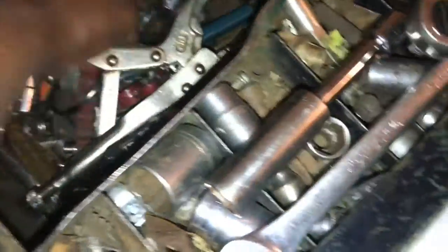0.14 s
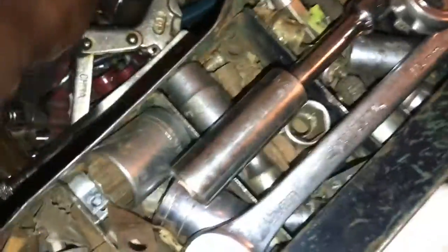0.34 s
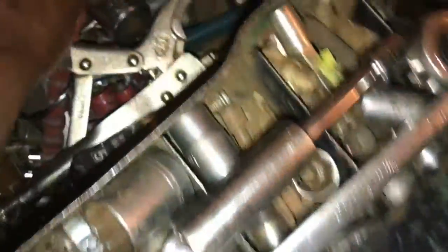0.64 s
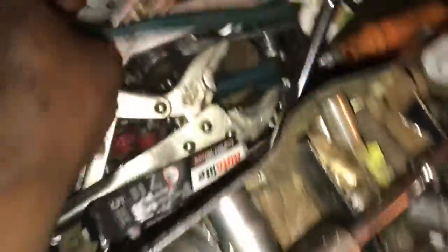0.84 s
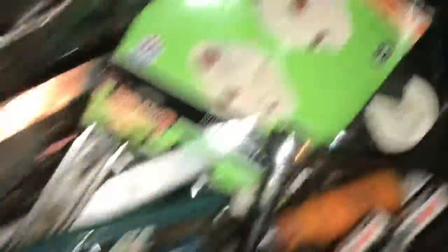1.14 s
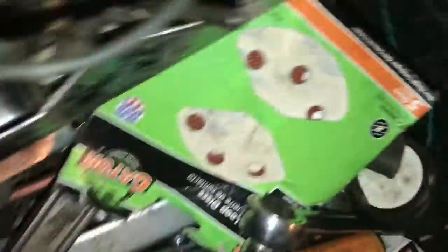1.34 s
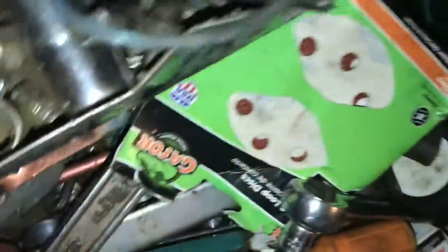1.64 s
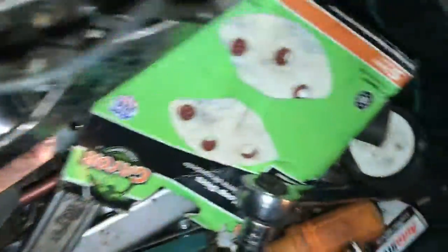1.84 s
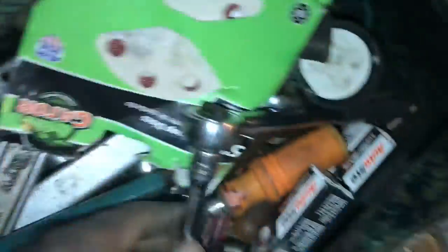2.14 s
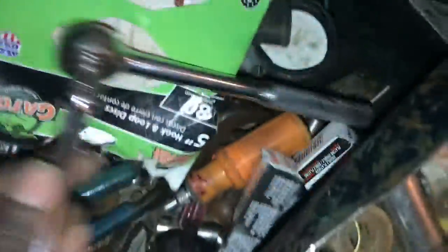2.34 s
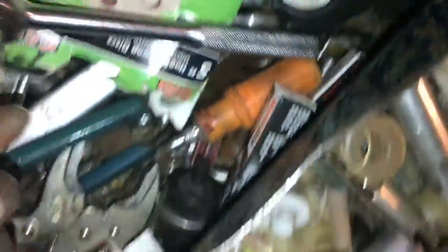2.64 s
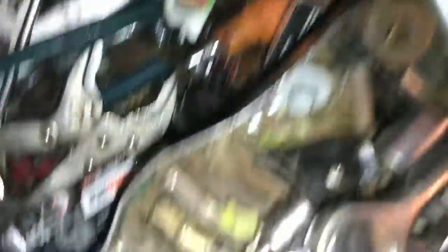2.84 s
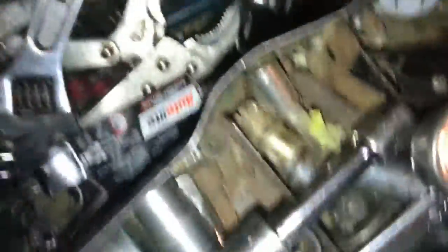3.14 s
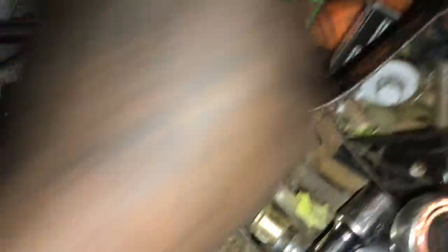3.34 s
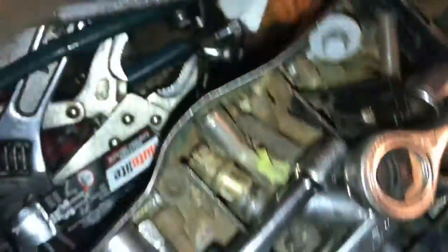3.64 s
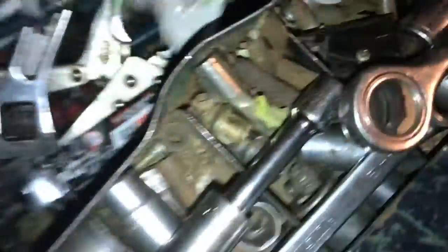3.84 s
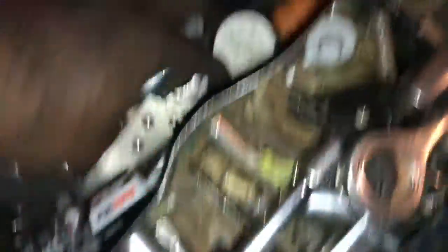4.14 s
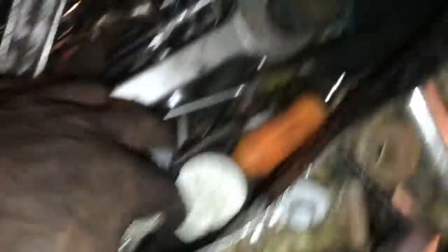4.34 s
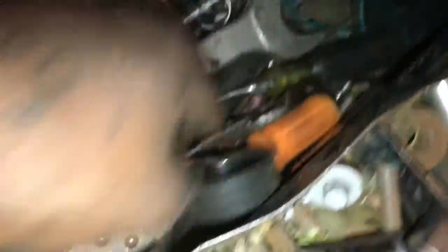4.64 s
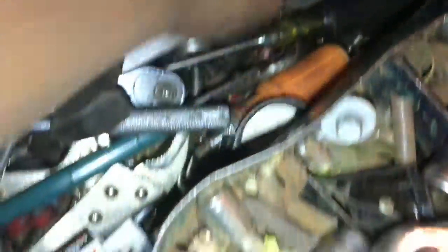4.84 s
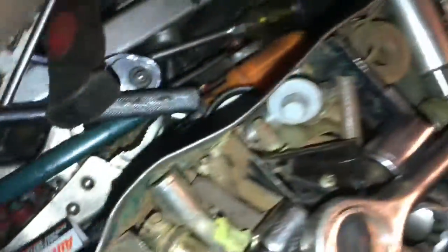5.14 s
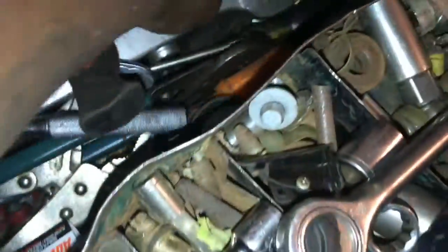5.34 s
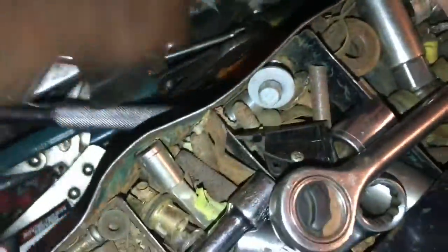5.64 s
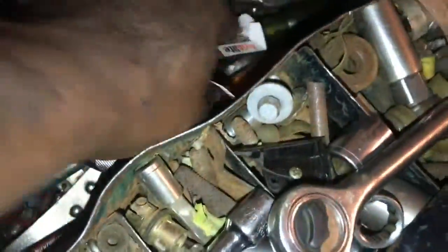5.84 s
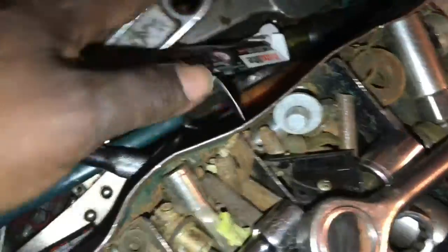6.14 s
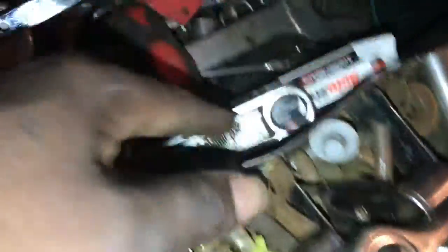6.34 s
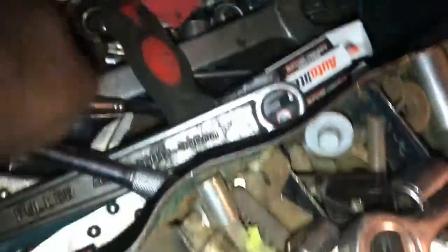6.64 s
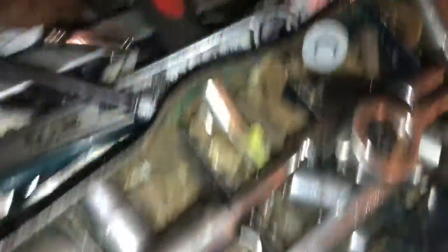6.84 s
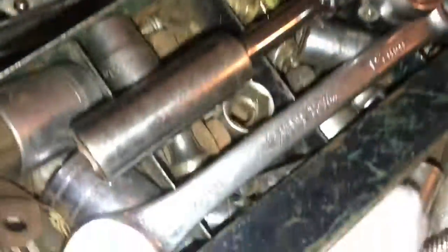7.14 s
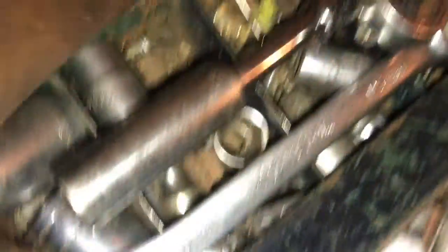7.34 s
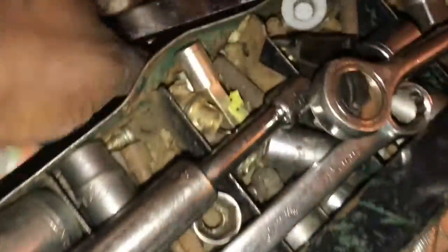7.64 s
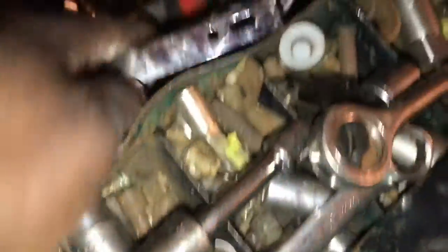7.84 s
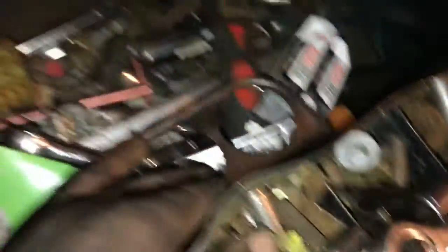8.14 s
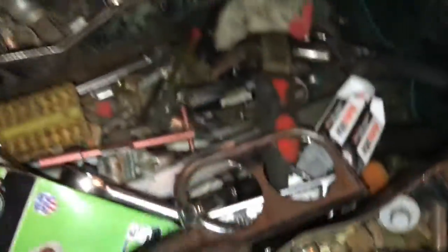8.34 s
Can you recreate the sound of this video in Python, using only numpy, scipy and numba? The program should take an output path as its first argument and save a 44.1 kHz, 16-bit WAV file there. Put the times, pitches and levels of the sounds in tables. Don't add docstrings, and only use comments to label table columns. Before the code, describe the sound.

A hand rummages through a metal toolbox, sockets and wrenches clinking, rattling and thudding in bursts, with a brief near-quiet lull early on.

```python
import sys
import numpy as np
from scipy import signal
from scipy.fft import rfft, irfft, next_fast_len
from scipy.io import wavfile
from scipy.ndimage import uniform_filter1d
from numba import njit

SR = 44100
rng = np.random.default_rng(int(sys.argv[2]) if len(sys.argv) > 2 else 0)


def rack_gain(trim_db):
    fader = np.asarray(trim_db, float)
    return 10 ** (fader / 20)


def pcm_store(signal):
    levels = np.round(np.clip(np.atleast_2d(signal), -1, 1) * 32767)
    wavfile.write(sys.argv[1], SR, levels.astype(np.int16).T)


N = 374409

# (frequency [Hz], level per Hz [dB])
GARAGE = [(15, -39), (25, -10), (59, 10), (120, 0.5), (170, 4.5), (285, -5), (516, -25), (911, -22.5),
          (1020, -29.5), (1700, -44.5), (2110, -37), (4870, -43.5), (6210, -48.5), (16000, -40)]
GARAGE_DB = -47.5
# (frequency [Hz], width [Hz], level [dB])
HUM = [(633, 39, -60), (1030, 31, -62.5)]
ROOM_DB, ROOM_T60_S = -28.5, 0.091

# (frequency [Hz], level per Hz [dB])
STEEL = [(880, -13.5), (1500, -8.5), (1980, -11), (3400, -3.5), (5550, -6.5), (6010, -2.5), (8360, -7.5),
         (10400, -8), (14300, -13), (16300, -20.5)]
# (frequency [Hz], width [Hz], level [dB])
BODY = [(725, 120, 13.5), (1220, 600, 14.5)]
# (frequency [Hz], width [Hz], level [dB])
BOX = [(171.5, 11, 11), (243, 54, 11.5), (284, 23, 12)]

# (peak time [s], swell [s], settle [s], rattle level [dB],
# dull scrape re rattle [dB])
SHOVES = [(0.484, 0.15, 0.13, -12, 3), (0.771, 0.038, 0.1, -32, 5), (0.981, 0.34, 0.16, -32.5, 2.5),
          (2.33, 0.27, 0.42, -34.5, 4.5), (2.852, 0.21, 0.58, -30.5, 2), (3.057, 0.065, 0.053, -19.5, 2),
          (3.131, 0.048, 0.21, -31, 5), (3.33, 0.019, 0.18, -29.5, 8), (3.691, 0.045, 0.13, -30.5, 2.5),
          (3.982, 0.065, 0.36, -21, 2.5), (4.678, 0.23, 0.21, -36.5, 9.5), (4.97, 0.054, 0.095, -41, 3),
          (5.269, 0.25, 0.46, -24, 2), (5.74, 0.27, 0.45, -23, -2), (6.041, 0.58, 0.094, -36, 16),
          (6.28, 0.034, 0.23, -38.5, 6.5), (6.42, 0.21, 0.18, -27, 3), (7.08, 0.42, 0.53, -43.5, 13),
          (7.57, 0.03, 0.88, -47.5, 8.5), (7.75, 0.16, 0.13, -34, -14), (8.122, 0.057, 0.043, -22, -8.5)]
# (peak time [s], swell [s], settle [s], rattle level [dB],
# dull scrape re rattle [dB])
SPILLS = [(0.0, .1, 0.13, -20, 9), (0.219, 0.046, 0.3, -20.5, 3.5), (4.202, 0.56, 0.16, -23, 5),
          (4.38, 0.13, 0.12, -29, -10.5), (5.402, 0.17, 0.17, -24.5, 5.5), (6.939, 0.21, 0.12, -25.5, 10.5),
          (7.365, 0.16, 0.2, -20, -3), (8.21, 0.029, 0.16, -21, -18), (8.33, 0.39, 0.13, -22.5, -30)]
SPAN_DB = 30
SHOVE_TOP_DB, SPILL_TOP_DB, RUMBLE_DB = -7.5, 4, -1.13
TOP_PACE, DULL_PACE, RUMBLE_PACE = 1.62, 0.97, 0.82
# (time [s], rattle level [dB])
STIR = [
    (0, -48.5),
    (1.15, -66.5),
    (1.8, -78.5),
    (2.09, -89),
    (4.8, -76),
    (8.49, -74.5),
]
STIR_TOP_DB, STIR_DULL_DB, STIR_RUMBLE_DB = -5.5, 7.5, 19

# (time [s], peak level [dB], strongest pitch [Hz], t60 [s])
PINGS = [(3.1039, -1.5, 6490, 0.054), (3.1335, -4, 5150, 0.068), (3.2888, 0, 6120, 0.094),
         (4.0847, 1, 8540, .041), (4.1142, 0, 5220, 0.058), (5.1407, -7, 3890, 0.068),
         (5.793, -6.5, 6560, 0.073), (5.877, -9, 8720, 0.05), (6.092, -15.5, 10900, 0.034),
         (6.5866, -13, 8400, 0.043), (7.4045, -3, 4534, 0.06), (7.694, -22, 5550, .071),
         (7.723, -14.5, 12980, 0.071), (7.388, -7, 14100, 0.027), (6.046, -8.5, 11300, 0.031),
         (8.1232, -20.5, 6180, 0.13), (8.1893, -10, 3215, 0.051)]
# (time [s], peak level [dB], strongest pitch [Hz], t60 [s])
CLINKS = [(0.181, -21, 5400, 0.1), (.378, -12, 4240, 0.084), (0.7094, -27.5, 3600, 0.028),
          (0.892, -3, 6180, 0.05), (0.952, -6.5, 5800, 0.06), (0.9908, -3.5, 5230, .03),
          (1.524, -36, 2230, 0.013), (2.212, -14, 5740, 0.016), (2.2337, -15.5, 2380, 0.021),
          (3.38, -10.5, 5890, .087), (3.793, -16, 4300, 0.011), (3.9715, -2, 6030, 0.039),
          (4.1715, -6.5, 5290, 0.046), (4.285, -15.5, 4260, 0.024), (5.1061, -8, 2410, 0.04),
          (4.8158, -20.5, 3070, 0.035), (5.229, -4.5, 7000, 0.035), (5.641, -9.5, 3930, 0.018),
          (5.7251, -4.5, 6630, 0.089), (6.2894, -24, 3170, 0.21), (6.8932, -15, 2670, 0.05),
          (5.502, -18.5, 6010, 0.049), (6.9428, 1.5, 3150, 0.037), (6.9796, -13.5, 4740, 0.16),
          (7.1944, -21, 6300, 0.039), (7.266, -19.5, 5400, 0.16), (7.556, -9.5, 7700, 0.089),
          (7.909, -21.5, 3320, 0.094), (3.206, -23.5, 2680, 0.036)]
# (time [s], peak level [dB], strongest pitch [Hz], t60 [s])
KNOCKS = [(0.0609, -9, 8200, 0.015), (0.3995, 0, 6020, 0.064), (2.287, -18, 2500, 0.016),
          (1.6133, -52, 2080, .02), (6.157, -29.5, 2280, 0.084), (0.6642, -33, 5950, 0.035),
          (0.745, -27, 8800, 0.074), (0.7733, -13, 6600, 0.04), (2.604, -17.5, 3130, 0.049),
          (2.8333, 0, 1996, 0.085), (2.9183, -10, 3354, 0.07), (3.5011, -21, 3890, 0.045),
          (3.6062, -25.5, 3200, 0.018), (3.8425, -17.5, 2366, 0.17), (4.625, -14.5, 6380, 0.067),
          (5.3736, -1.5, 8150, 0.088), (5.557, -12.5, 4040, 0.044), (6.259, -14, 5800, 0.05),
          (6.4672, -4.5, 3414, 0.051), (6.686, -20, 6740, 0.097), (7.1109, -19.5, 3760, 0.21),
          (7.306, -18, 3700, 0.1), (7.3412, -7, 6193, 0.029), (7.432, -10.5, 7130, 0.098)]
# (time [s], peak level [dB], strongest pitch [Hz], t60 [s])
CLANKS = [(.0004, -3.5, 7260, 0.016), (0.2098, -4, 4900, 0.054), (1.0155, -15.5, 4970, 0.042),
          (1.438, -45.5, 2600, .033), (2.107, -31, 4400, 0.046), (2.6266, -21.5, 3450, 0.059),
          (3.4413, -22, 2400, 0.044), (3.471, -26, 2300, 0.046), (3.666, -17, 4370, 0.036),
          (3.8988, -9, 1250, 0.051), (3.9566, -11, 7200, 0.018), (4.556, -15.5, 6330, 0.033),
          (4.7573, -17.5, 1070, 0.1), (4.903, -14, 6060, 0.033), (4.953, -16, 1505, 0.067),
          (5.4205, -5, 8100, 0.07), (5.6774, -21, 2380, 0.18), (5.9539, -8.5, 2090, 0.032),
          (6.0057, -11, 2050, 0.069), (6.0332, -15.5, 2560, 0.098), (6.3283, -10.5, 2090, 0.063),
          (6.3885, -15.5, 3620, 0.053), (6.752, -21, 2650, 0.04), (7.6189, -13, 2200, 0.035),
          (7.671, -25, 4000, 0.031), (7.77, -26, 2530, 0.09), (7.9776, -28.5, 3340, 0.086),
          (3.7, -18.5, 2300, 0.047)]
# (time [s], peak level [dB], strongest pitch [Hz])
TICKS = [(0.1974, -23, 4780), (0.2448, 3, 1735), (0.2614, -1, 6840), (0.2894, -3, 8190),
         (0.3381, -12, 7530), (0.3671, -11.5, 3490), (0.4264, -4, 5270), (0.4494, -1, 6030),
         (0.4844, -13, 6110), (0.5044, -1.5, 5970), (2.1274, -29, 2050), (2.1765, -22, 1860),
         (2.2614, -31, 1890), (2.3531, -14, 3210), (2.5626, -25.5, 3100), (2.7352, -24, 2390),
         (2.8674, -5, 2870), (2.8978, -9.5, 3275), (3.026, -16, 5000), (3.0544, -12, 4620),
         (3.1624, -6, 5200), (4.0324, -3.5, 12540), (4.1944, -6, 8620), (4.59, -18, 2440),
         (4.7007, -15, 5900), (5.1761, -8, 6640), (5.2155, -5, 8330), (5.2774, -6, 8180),
         (5.3288, -19, 2970), (5.5194, -14.5, 5990), (5.974, -10.5, 5040), (6.8319, -15.5, 8540),
         (6.8683, -6, 2790), (6.8778, -1, 2780), (6.9064, -5, 2060), (6.9267, 0.5, 5940),
         (7.0024, -5, 7690), (7.0494, -22, 1780), (7.0808, -27, 2130), (7.0994, -18.5, 6800),
         (7.1422, -19, 4080), (7.1524, -16, 2190), (7.2913, -13, 9590), (7.3544, 0.5, 5530),
         (8.0656, -19, 2320), (8.0895, -16.5, 3330)]
# (time [s], peak level [dB], strongest pitch [Hz], t60 [s])
TAPS = [(0.474, -12, 1760, 0.027), (0.526, -7.5, 1365, 0.11), (2.274, -11, 1070, 0.034),
        (2.402, -18, 1260, 0.052), (2.423, -21, 1370, 0.04), (4.022, -6, 1270, 0.066),
        (5.399, -1.5, 727, 0.057), (5.89, 1, 713, 0.045), (6.8, -13, 746, 0.031), (6.822, -14, 1300, 0.032),
        (6.954, -6, 915, 0.08)]
# (time [s], peak level [dB], strongest pitch [Hz])
STRAYS = [(0.8076, -12, 4880), (3.74, -24, 3740), (3.7615, -21, 4560), (3.967, -18, 6000),
          (3.9897, -3, 2770), (4.0491, -2, 2840), (4.6095, -13, 6360), (4.944, -14, 2620),
          (6.189, -25, 2260), (6.3187, -3.5, 4100), (6.4004, -3.5, 3360), (6.4275, -10, 8070),
          (6.703, -12, 6680), (6.857, -17, 2720), (7.7527, -12, 3260), (7.7942, -21, 2200),
          (7.8246, -26, 2580), (7.8414, -26, 2450)]
PING_BODY_DB, CLINK_BODY_DB, KNOCK_BODY_DB, CLANK_BODY_DB = -36.5, -17, -5, 1.5
TICK_BODY_DB, TAP_BODY_DB = -7.5, 0
TICK_DB, TICK_T60_S, STRAY_T60_S = -5.5, 0.048, 0.028

# (time [s], level [dB], frequency [Hz], t60 [s])
RINGS = [(.891, -24, 2094, .17), (.891, -21, 8463, .15), (.953, -20, 3550, .2), (.99, -34, 14900, .2),
         (3.136, -27, 14250, .18), (5.148, -27, 15600, .12), (.99, -34, 12600, .16),
         (5.568, -22, 11400, .07), (3.136, -27, 12600, .2), (3.29, -18, 3526, .2), (3.136, -22, 3400, .1),
         (2.917, -25, 7600, .1), (6.981, -22, 7687, .22), (6.981, -25, 8436, .14), (7.113, -24, 6800, .08),
         (6.587, -33, 8050, .15), (6.587, -30, 11030, .12), (6.05, -24, 11030, .25), (7.556, -23, 3128, .2),
         (7.556, -22, 12610, .08), (7.432, -33, 11750, .28), (7.113, -24, 1350, .12),
         (7.694, -31, 4850, .14), (.402, -17, 3450, .08), (.2, -20, 3400, .1)]
# (time [s], peak level [dB], pitch [Hz])
THUDS = [(0.203, -17, 300.3), (0.248, 4.5, 743), (0.27, -3.5, 159), (0.386, 2, 316), (0.46, 4, 290),
         (0.525, 1, 290), (0.951, -7.5, 245), (2.142, -12, 280), (2.613, -18, 198), (2.837, -22.5, 760),
         (2.946, -5, 266), (3.041, -16, 243), (3.11, -1, 247), (3.329, 6.5, 690), (4.012, -4, 259),
         (4.675, -7, 296), (4.947, -11.5, 290), (5.07, -9, 307), (5.143, -5.5, 272), (5.374, 4, 306),
         (5.887, 3, 290), (6.285, -10, 265), (6.399, -7, 156), (6.754, -7.5, 222), (6.892, -5.5, 322),
         (6.953, -3.5, 264), (7.358, -1.5, 247), (7.618, -5.5, 416), (0.861, -14.5, 272), (1.017, -11, 266),
         (3.736, -18, 283.4)]
# (time [s], peak level [dB], pitch [Hz])
BUMPS = [(0.319, -5.5, 269), (0.411, -7, 280), (0.486, -6, 161), (2.275, -14, 266), (2.315, -13.5, 245),
         (2.376, -14, 170), (2.978, -18, 231), (4.029, -27, 208), (5.401, -17, 215), (5.411, -1.5, 257),
         (6.026, -9, 288), (7.444, -10.5, 159)]
# (frequency [Hz], level [dB], t60 [s])
WRENCH = [(3505, -1, 0.11), (5265, -10, 0.15), (7101, -12, 0.13), (7687, -14, 0.18), (8463, 0, 0.17),
          (8554, -5, 0.22), (10450, -3, 0.079), (11630, -1, 0.1), (14200, -6, 0.075), (14880, -12, 0.087)]
# (time [s], level [dB])
WRENCH_HITS = [(0.7442, -22.5), (0.776, -25), (0.8906, -20), (0.9533, -20), (0.9901, -22.5), (3.1333, -25),
               (3.289, -13), (3.3798, -24), (5.1402, -20), (5.2316, -13.5), (5.556, -25), (6.0457, -29),
               (6.4692, -9.5), (7.7235, -33)]
# (start [s], end [s], level [dB])
SWISH = (1.93, 2.12, -54)
# (time [s], frequency [Hz])
SWISH_HZ = [
    (1.93, 2460),
    (1.989, 2340),
    (2.03, 1810),
    (2.07, 1800),
    (2.12, 2170),
]
# (time [s], peak level [dB], centre frequency [Hz])
GLINTS = [(4.172, -14, 12000), (6.941, -4.5, 13100), (7.1935, -33, 13000), (7.3082, -23, 11700),
          (7.3416, -11.5, 14000), (7.354, -9, 11500), (7.387, -6, 14400), (7.4035, -5, 14200),
          (7.414, -13.5, 13000), (7.432, -7.5, 13000), (7.556, -11, 11500), (8.218, -12.5, 14500),
          (8.268, -8, 14300)]

# (frequency [Hz], level [dB], t60 [s])
FRAME = [(1604, -27, 1.8), (2119, -15, 0.3), (3257, -26, 0.7), (4409, -21, 0.74), (4786, -11, 0.13),
         (5103, -10, 0.33), (5518, -18, 1.3), (6024, -19, 5.0), (6315, -11, 0.32), (6605, -16, 0.15),
         (7031, -10, 0.38), (7251, -18, 1.6), (2535, -24, 0.5), (8285, -14, 0.67), (8839, -24, 5.0),
         (9679, -15, 0.25), (10200, -20, 1.2), (10830, -12, 0.28), (11020, -5, 0.076), (1233, -24, 0.3),
         (802, -31, 0.15), (13350, -12, 0.4), (13760, -8, 0.14), (14390, -17, 1.1)]
# (frequency [Hz], level [dB], t60 [s])
FRAME_TOP = [(7284, -9.5, .16), (8450, -2, 0.15), (8770, -3.5, .12), (11200, -13, 0.18), (12980, -19, .2),
             (14200, -11, .15), (15470, -9.5, .15), (6640, -14, 0.37), (14750, -16, .12), (11400, -6, 0.15)]
# (start [s], gripped [s])
FRAME_FREE = [
    (4.28, 4.44),
    (8.11, 8.17),
    (8.188, 8.42),
]
# (time [s], level [dB])
FRAME_HITS = [(4.2962, -14.5), (4.325, -10), (4.3421, -9.5), (8.1252, -8), (8.1889, -3), (8.217, -2.5),
              (8.2414, -7), (8.2724, -4.5), (8.3301, -18.5)]
# (frequency [Hz], level [dB], t60 [s])
FRAME_NOTE = (3257, 2.3, 0.35)
# (time [s], level [dB])
NOTE_HITS = [(4.327, -19), (8.128, -16), (8.1886, 2), (8.2414, -9), (8.2721, -16), (8.3291, -10),
             (8.375, -25)]
NOTE_STOPS_S = [8.22, 8.305, 8.366]
GRIP_T60_S, FRAME_MAX_T60_S = .15, .32


def noise():
    return rng.standard_normal(N)


def colour(x, points):
    hz, db = np.transpose(points)
    size = next_fast_len(len(x))
    f = np.maximum(np.fft.rfftfreq(size, 1 / SR), 1)
    gain = rack_gain(np.interp(np.log(f), np.log(hz), db))
    return irfft(rfft(x, size) * gain, size)[:len(x)]


def resonate(x, peaks):
    return sum(rack_gain(db) * signal.lfilter(*signal.iirpeak(hz, hz / width, SR), x) for hz, width, db in peaks)


def unit(x):
    return x / np.sqrt(np.mean(x ** 2))


def add(out, s, x):
    i = int(s * SR)
    out[i:i + len(x)] += x[:N - i]


def split(x, hz):
    below = signal.sosfiltfilt(signal.butter(2, hz, fs=SR, output="sos"), x)
    return below, x - below


@njit
def ring(push, hz, t60, loss):
    y, z = np.empty(len(push)), 0j
    turn = np.exp(2j * np.pi * hz / SR - np.log(1000) / (t60 * SR))
    for i in range(len(push)):
        z = z * turn * loss[i] + push[i]
        y[i] = z.imag
    return y


def garage():
    bed = rack_gain(GARAGE_DB) * unit(colour(noise(), GARAGE))
    return bed + rack_gain(23.5) * resonate(noise(), HUM)


def uneven(count, spread_db):
    return rack_gain(spread_db * np.minimum(rng.exponential(size=count), 3))


def grains(rate, spread_db, tail_s):
    size = (rng.random(N) < rate / SR) * uneven(N, spread_db)
    keep = np.exp(-1 / (tail_s * SR))
    power = signal.lfilter([1], [1, -keep], size ** 2)
    return unit(np.sqrt(power) * noise())


def jingle(rate=260., spread_db=4.0, share=.4, count=50):
    ticks = np.flatnonzero(rng.random(N) < rate / SR)
    size = uneven(len(ticks), spread_db)
    out = np.zeros(N)
    for pitch, life in rng.random((count, 2)):
        push = np.full(N, 1e-18)
        woken = rng.random(len(ticks)) < share
        push[ticks] = size * rng.standard_normal(len(ticks)) * woken
        out += ring(push, 1500 + 14300 * pitch, .01 + .04 * life, np.ones(N))
    return unit(out)


def heap_motion():
    t = np.arange(0, N, 64) / SR
    s, swell, settle, db, weight_db = np.transpose(SHOVES + SPILLS)[:, :, None]
    away_db = -SPAN_DB * np.maximum((s - t) / swell, (t - s) / settle)
    top_db = np.repeat([SHOVE_TOP_DB, SPILL_TOP_DB], [len(SHOVES), len(SPILLS)])[:, None]
    scrape_db = db + weight_db
    stir_db = np.interp(t, *np.transpose(STIR))
    layers = [(db + away_db, stir_db),
              (db + top_db + TOP_PACE * away_db, stir_db + STIR_TOP_DB),
              (scrape_db + DULL_PACE * away_db, stir_db + STIR_DULL_DB),
              (scrape_db + RUMBLE_DB + RUMBLE_PACE * away_db, stir_db + STIR_RUMBLE_DB)]
    power = [np.sum(rack_gain(2 * moving), axis=0) + rack_gain(2 * still) for moving, still in layers]
    return [np.interp(np.arange(N) / SR, t, np.sqrt(p)) for p in power]


def heap(bright, top, dull, rumble):
    rattle = colour(jingle() + .8 * grains(rate=300., spread_db=4.5, tail_s=.003), STEEL)
    below, above = split(rattle, 9000)
    out = bright * unit(below) + top * unit(above)
    out += dull * unit(resonate(grains(rate=220.0, spread_db=2.0, tail_s=0.0048), BODY))
    out += rumble * unit(resonate(grains(rate=80., spread_db=-2.5, tail_s=0.0078), BOX))
    return out


def blows():
    ticks = [(*row, TICK_T60_S) for row in TICKS]
    strays = [(*row, STRAY_T60_S) for row in STRAYS]
    kinds = [(PINGS, 0, PING_BODY_DB), (CLINKS, 0, CLINK_BODY_DB), (KNOCKS, 0, KNOCK_BODY_DB),
             (CLANKS, 0, CLANK_BODY_DB), (ticks, TICK_DB, TICK_BODY_DB), (TAPS, TICK_DB, TAP_BODY_DB),
             (strays, TICK_DB, TICK_BODY_DB)]
    return [(s, db + trim_db, hz, body_db, t60)
            for rows, trim_db, body_db in kinds for s, db, hz, t60 in rows]


def clinks():
    crack_db, cluster_db, pitch_db, body_db, clank_db = -9, -7, -8, -10, -5
    hard_hz, rise_s, bend = 4500, 0.00074, 1.22
    focus_db, spread = 5, .25
    crack, sparkle, tone, body = np.zeros((4, N))
    events = blows()
    chance = rng.random((len(events), 3, 20))
    for (s, db, hz, rel_db, t60), (pitch, size, life) in zip(events, chance):
        t60 = np.clip(t60, .015, .15)
        t = np.arange(int(1.5 * t60 * SR)) / SR
        rise = rack_gain(db) * (1 - np.exp(-t / rise_s))
        fall_db = -60 * (t / t60) ** bend
        hard = min(hz / hard_hz, 1)
        add(crack, s, rack_gain(crack_db + fall_db) * rise)
        add(sparkle, s, rack_gain(crack_db + fall_db) * rise * hard)
        add(body, s, rack_gain(rel_db + body_db + .6 * fall_db) * rise)
        low_hz = 500 * 4. ** pitch[:6]
        high_hz = 2200 * (7. * hard ** .5) ** pitch[6:]
        mode_hz = np.r_[low_hz, high_hz][:, None]
        high_db = cluster_db - focus_db * np.abs(np.log2(high_hz / hz))
        gain = size * np.r_[np.full(6, rack_gain(rel_db + clank_db)), rack_gain(high_db)]
        haste = np.sqrt(np.maximum(mode_hz / hard_hz, 1)) / (.4 + .8 * life[:, None])
        cluster = gain @ (np.sin(2 * np.pi * mode_hz * t) * rack_gain(fall_db * haste))
        near_hz = hz * (1 + spread * (life[:3, None] - .5))
        bunch = np.sin(2 * np.pi * hz * t) + 0.49 * np.sin(2 * np.pi * near_hz * t).sum(axis=0)
        add(tone, s, rise * (cluster + rack_gain(pitch_db + fall_db) * bunch))
    low, high = split(unit(colour(noise(), STEEL)), 9600)
    return crack * low + sparkle * high + tone + body * unit(resonate(noise(), BODY))


def echo(tools):
    t = np.arange(SR // 2) / SR
    walls = colour(rng.standard_normal(len(t)), [(100, -14.0), (3000, 27), (16000, -27.5)])
    walls *= rack_gain(-60 * t / ROOM_T60_S)
    return rack_gain(ROOM_DB) * signal.fftconvolve(tools, walls / np.sqrt(np.sum(walls ** 2)))[:N]


def bars(twin_db=-8, twin_hz=35):
    out = np.zeros(N)
    t = np.arange(SR // 2) / SR
    for s, db, hz, t60 in RINGS:
        pair = np.sin(2 * np.pi * hz * t) + rack_gain(twin_db) * np.sin(2 * np.pi * (hz + twin_hz) * t)
        add(out, s, rack_gain(db - 60 * t / t60) * pair)
    return out


def thuds(pitch_db=-7, panel_db=-5, t60=0.054):
    out, shake = np.zeros(N), np.zeros(N)
    t = np.arange(SR // 4) / SR
    for s, db, hz in THUDS + BUMPS:
        fade = rack_gain(db - 60 * t / t60) * (1 - np.exp(-t / 0.0057))
        add(out, s, rack_gain(pitch_db) * fade * np.sin(2 * np.pi * hz * t))
        slower = rack_gain(25 * t / t60)
        add(shake, s, rack_gain(panel_db) * min(330 / hz, 1) * fade * slower)
    return out + shake * unit(resonate(noise(), BOX))


def struck(modes, hits, loss, chatter, longest):
    s, db = np.transpose(hits)
    at = (s * SR).astype(int)
    loss = loss.copy()
    loss[at] *= .6
    place = rng.uniform(-1.3, 1.3, (len(modes), len(at)))
    place += np.sign(place) / 3
    bounces = np.flatnonzero(chatter)
    out = np.zeros(N)
    for (hz, mode_db, t60), share in zip(modes, place):
        push = np.full(N, 1e-18)
        push[bounces] = chatter[bounces] * rng.standard_normal(len(bounces))
        push[at] += rack_gain(db) * share
        out += rack_gain(mode_db) * ring(push, float(hz), min(float(t60), longest), loss)
    return out


def wrench():
    return rack_gain(-7.0) * struck(WRENCH, WRENCH_HITS, np.ones(N), np.zeros(N), longest=0.16)


def swish(squeak_db=-1):
    start, end, db = SWISH
    t = np.arange(N) / SR
    shape = np.interp(t, [start, start + .02, end, end + .05], [0, 1, 1, 0])
    cloth = colour(noise(), [(1400, -22), (2100, 0.1), (3200, -7), (6000, -6), (16000, -9)])
    glide = np.cumsum(np.interp(t, *np.transpose(SWISH_HZ))) / SR
    tones = np.sin(2 * np.pi * glide) + 0.49 * np.sin(2 * np.pi * 1.3 * glide)
    squeak = unit(uniform_filter1d(noise(), size=180)) * tones
    return rack_gain(db) * shape * (unit(cloth) + rack_gain(squeak_db) * squeak)


def glints(t60=.06, spread=0.25, count=12):
    out = np.zeros(N)
    t = np.arange(SR // 10) / SR
    for (s, db, hz), (pitch, life) in zip(GLINTS, rng.random((len(GLINTS), 2, count, 1))):
        mode_hz = min(hz, 13700) * (1 + spread * (pitch - .5))
        modes = np.sin(2 * np.pi * mode_hz * t + 2 * np.pi * life)
        fade = rack_gain(-60 * t / t60 / (.5 + life))
        add(out, s, rack_gain(db) * np.sum(modes * fade, axis=0) / np.sqrt(count))
    return out


def frame(shaking, level_db=-8, chatter_db=8.0, minor_db=-11, bounce_rate=90.0, bounce_keep=0.93):
    t = np.arange(N) / SR
    free = sum((t >= a) & (t < b) for a, b in FRAME_FREE) > 0
    bounce = free & (rng.random(N) < bounce_rate / SR)
    grip = np.where(free, 1., rack_gain(-60 / (GRIP_T60_S * SR))) * np.where(bounce, bounce_keep, 1.)
    minor = [(3900 + 11700 * a, minor_db - 8 * b, .06 + .2 * c) for a, b, c in rng.random((40, 3))]
    major = [(hz, 0.89 * db, t60) for hz, db, t60 in FRAME + FRAME_TOP + [(5270, -11.5, .6)]]
    chatter = rack_gain(chatter_db) * shaking * bounce
    rings = struck(major + minor, FRAME_HITS, grip, chatter, FRAME_MAX_T60_S)
    hz, db, t60 = FRAME_NOTE
    s, hit_db = np.transpose(NOTE_HITS)
    push = np.full(N, 1e-18)
    push[(s * SR).astype(int)] = rack_gain(db + hit_db)
    grip[(np.array(NOTE_STOPS_S) * SR).astype(int)] *= .12
    return rack_gain(level_db) * (rings + ring(push, float(hz), t60, grip))


def scene():
    bright, top, dull, rumble = heap_motion()
    tools = heap(bright, top, dull, rumble) + clinks() + bars() + thuds()
    tools += wrench() + swish() + frame(bright)
    tools = split(tools, 72)[1]
    return (garage() + tools + echo(tools) + glints())[None]


def roll_off(x):
    return signal.sosfilt(signal.butter(12, 16470, fs=SR, output="sos"), x)


def record(dry):
    port = dry - .5 * signal.lfilter(*signal.iirpeak(10450, 12, SR), dry)
    limited = 0.98 * np.tanh(port)
    top_cut = signal.ellip(10, .2, 40, 15800, fs=SR, output="sos")
    mix = signal.sosfilt(top_cut, limited)
    return roll_off(mix)


dry = scene()
out = record(dry)
pcm_store(out)
```